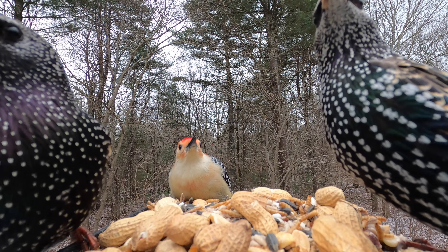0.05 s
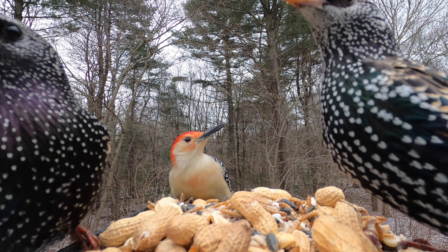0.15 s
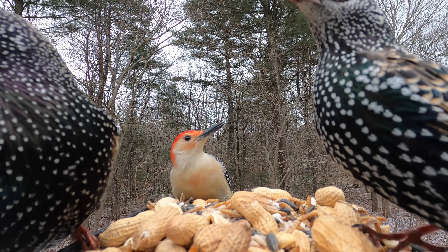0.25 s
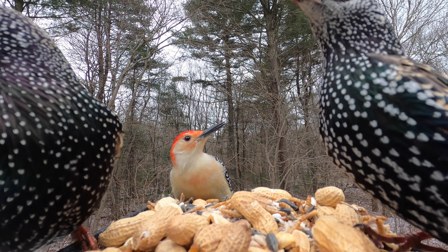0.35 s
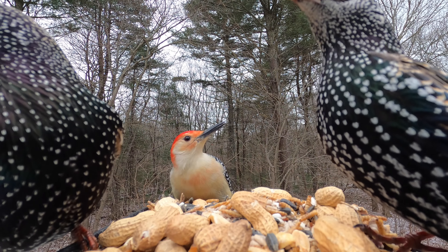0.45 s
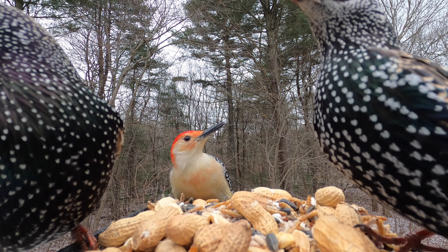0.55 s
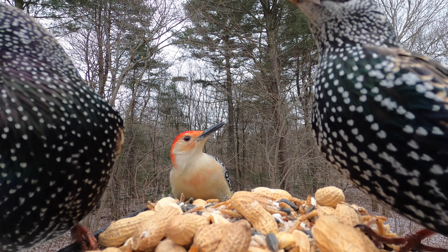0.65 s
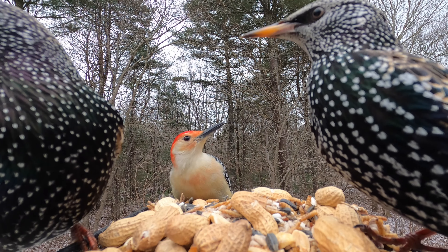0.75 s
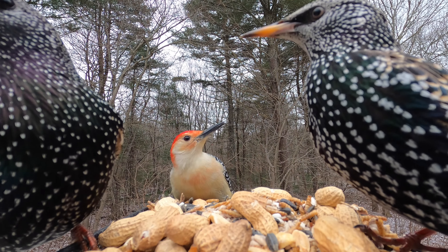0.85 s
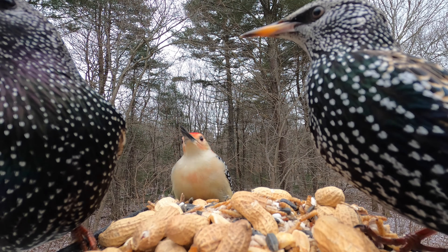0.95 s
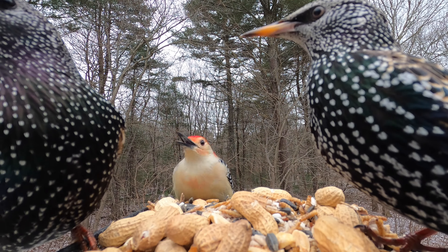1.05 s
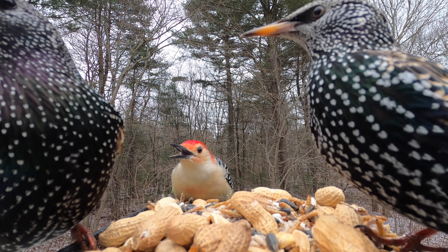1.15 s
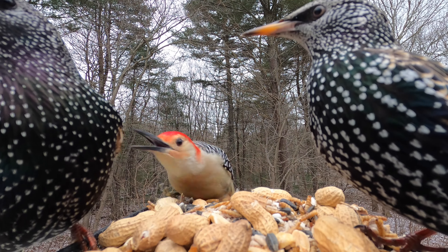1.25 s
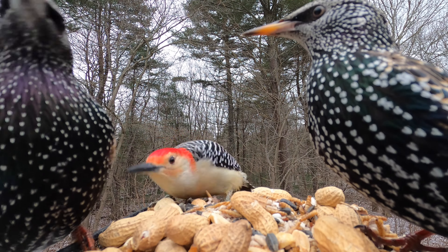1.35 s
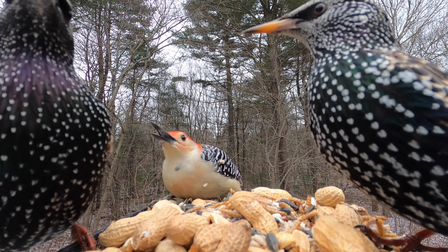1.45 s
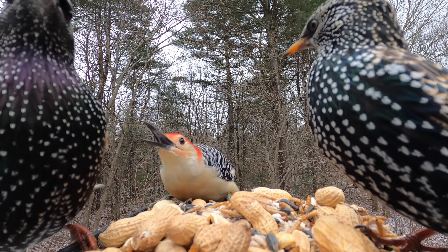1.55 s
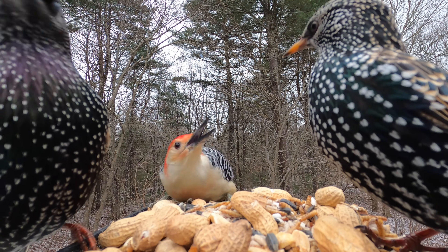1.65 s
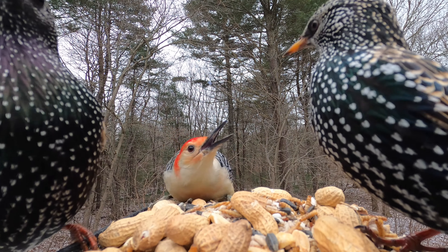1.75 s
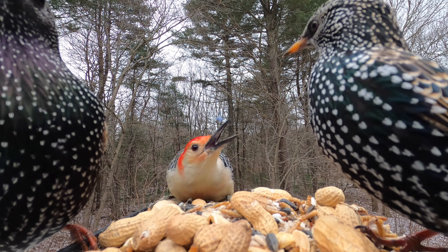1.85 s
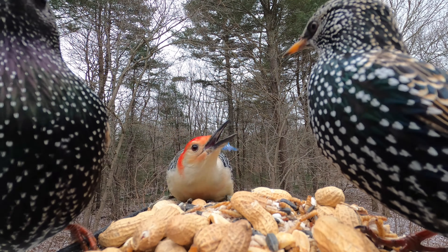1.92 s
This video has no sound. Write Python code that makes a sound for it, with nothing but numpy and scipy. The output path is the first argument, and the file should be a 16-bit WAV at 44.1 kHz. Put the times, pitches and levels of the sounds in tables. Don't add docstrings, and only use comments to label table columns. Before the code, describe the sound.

Near-mono close pickup on a tray of peanuts in bare woodland. Bright, nasal woodpecker calls of about a third of a second slide downward and ring briefly among the trees. Between them, beaks knock the tray, claws tick hollow shells and husks crackle, strongest near five seconds. Low wind rumble and puffs bump the microphone over a faint woodland hush.

```python
import sys
import numpy as np
from scipy import signal
from scipy.fft import rfft, irfft, next_fast_len
from scipy.io import wavfile
from scipy.ndimage import uniform_filter1d

SR = 44100
rng = np.random.default_rng(int(sys.argv[2]) if len(sys.argv) > 2 else 0)


def linear_from_db(decibels):
    return 10 ** (np.asarray(decibels, float) / 20)


def dump(signal):
    limited = np.clip(np.atleast_2d(signal).T, -1, 1)
    pcm = np.round(limited * 32767).astype(np.int16)
    wavfile.write(sys.argv[1], SR, pcm)


N = 264908

# (frequency [Hz], level [dB])
AIR_COLOUR = [(150, -41), (250, -2), (460, -6), (1000, -15), (1700, -20.5), (2300, -25.5), (3600, -21.5),
              (4500, -27), (7700, -30), (9300, -38), (16000, -71.5)]
# (time [s], level [dB])
HUSH_DRIFT = [(0, 0), (.9, -4), (1.799, -2.5), (2.6, -6), (4.199, -3), (6.01, 2.5)]
# (frequency [Hz], time to fall 60 dB [s])
WOODS_RING = [(900, 2.3), (3500, 0.99), (7000, 0.78), (12000, 1.06)]
WOODS_DB = -15

# (start [s], end [s], level [dB], start pitch [Hz], end pitch [Hz])
FAR_CALLS = [
    (0.57, 0.66, -82, 875, 906),
    (0.662, 0.764, -80.5, 922, 795),
    (0.74, 0.85, -88.5, 918, 897),
    (4.723, 5.018, -82, 936, 807),
]
# (start [s], end [s], level [dB], start pitch [Hz], end pitch [Hz])
FAR_CHIPS = [
    (1.026, 1.06, -65.5, 1470, 1235),
    (1.083, 1.106, -68, 1440, 1260),
    (1.15, 1.18, -100, 1310, 1150),
]
# (start [s], end [s], level [dB], start pitch [Hz], end pitch [Hz])
SOFT_CLUCKS = [
    (0.05, 0.078, -53, 1105, 977),
    (0.11, 0.131, -58.5, 1165, 960),
    (0.173, 0.194, -57.5, 1137, 1058),
    (0.248, 0.263, -57.5, 1190, 1006),
    (0.316, 0.347, -67, 960, 926),
    (5.135, 5.203, -79, 8600, 9500),
]

# (time [s], rumble level [dB])
WIND_LEVEL = [(0, -35.5), (.25, -44), (.75, -26.5), (1.1, -35.5), (1.49, -33), (1.59, -48.5), (1.69, -26),
              (1.94, -34), (2.06, -48), (2.32, -30.5), (2.49, -47), (3.05, -35), (3.29, -43), (3.81, -45),
              (4.12, -31), (4.57, -46), (5.29, -35.5), (6.01, -42)]
# (frequency [Hz], level [dB])
RUMBLE_COLOUR = [(12, -40), (25, -1), (60, 0), (100, -10.5), (200, -24.5), (400, -89), (1500, -140)]
# (frequency [Hz], level [dB])
BUFFET_COLOUR = [(50, -21.5), (110, 5), (220, -3.5), (330, -16), (500, -29.5), (900, -54), (3000, -140)]
# (time [s],
# peak level [dB], half length [s])
WIND_PUFFS = [(0.347, -38.5, 0.0094), (0.445, -37.5, 0.0093), (0.52, -53, 0.014), (0.65, -30.5, 0.012),
              (0.733, -36, 0.011), (0.783, -30, 0.0056), (0.827, -36, 0.012), (0.929, -34, 0.018),
              (0.999, -18.5, 0.014), (1.079, -38.5, 0.011), (1.149, -38.5, 0.0089), (1.285, -38, 0.012),
              (1.389, -37.5, 0.0093), (1.49, -39.5, 0.0058), (1.702, -35, 0.011), (1.906, -56, 0.01),
              (2.281, -44, 0.0097), (2.349, -38.5, 0.01), (2.926, -36, 0.0057), (3.029, -42, 0.0043),
              (3.073, -34, 0.0023), (3.118, -19.5, 0.034), (3.875, -44, 0.0076), (3.968, -25.5, 0.0094),
              (4.027, -38.5, 0.024), (4.149, -27.5, 0.011), (4.324, -39, 0.02), (4.63, -45.5, 0.016),
              (4.994, -49, 0.012), (5.226, -30, 0.0038), (5.431, -39.5, 0.017), (5.554, -43.5, 0.012),
              (5.732, -39, 0.0085), (5.835, -41, 0.019), (5.913, -31.5, 0.024), (5.994, -50, 0.0097)]

# (start [s], length [s], dull scrape [dB], bright crackle [dB])
SHELL_MOVES = [(0.301, 0.08, -57, -69.5), (1.321, 0.11, -42.5, -53.5), (1.415, 0.049, -58, -64),
               (1.454, 0.12, -55.5, -63), (2.814, 0.054, -40.5, -40.5), (2.789, 0.032, -44.5, -47.5),
               (2.9, 0.11, -80, -59.5), (3.056, 0.012, -56, -55.5), (3.142, 0.082, -46.5, -53),
               (2.102, 0.018, -51.5, -83), (2.127, 0.071, -51, -61.5), (5.831, 0.024, -49, -51.5),
               (5.869, 0.022, -51, -55), (3.185, 1.25, -73, -71), (3.343, 0.061, -53.5, -53),
               (3.416, 0.096, -60.5, -72), (3.519, 0.091, -68.5, -71), (3.627, 0.023, -64, -67),
               (3.723, 0.076, -66.5, -64.5), (3.841, 0.044, -87, -73), (3.963, 0.041, -60, -58),
               (4.057, 0.03, -99, -66), (4.708, 0.24, -94, -66.5), (4.303, 0.08, -46, -58),
               (4.319, 0.14, -59, -62), (4.609, 0.07, -44, -52), (4.674, 0.031, -58, -59.5),
               (4.925, 0.21, -61.5, -75), (4.982, 0.055, -41, -43), (5.03, 0.044, -58, -60.5),
               (5.07, 0.11, -83, -61.5), (5.217, 0.048, -40.5, -43.5), (5.257, 0.23, -63.5, -66),
               (5.393, 0.12, -43.5, -66)]
# (frequency [Hz], level [dB])
SCRAPE_COLOUR = [(180, -31), (300, -21.5), (788, 5), (1100, 0.5), (2650, -1), (3350, 0.5), (5000, -3.5),
                 (6500, -31.5), (11000, -120)]
# (frequency [Hz], level [dB])
CRACKLE_COLOUR = [(2500, -24), (3500, -8), (4500, 0), (5800, -5), (7800, -3), (9300, -26), (16000, -50)]
# (frequency [Hz], level [dB])
WHOLE_SHELLS = [(5000, -5), (6500, -25)]
# (frequency [Hz], level [dB])
THIN_SPLINTERS = [(5000, -20), (6500, 0)]
# (frequency [Hz], level [dB])
SPLINTER_COLOUR = [(8000, -29), (10000, -4), (12000, -6), (16000, -21.5)]

# (time [s], knock peak [dB], snap against knock [dB], knock pitch [Hz])
HARD_PECKS = [
    (1.3351, -22, -19.5, 1500),
    (3.1554, -34, 3, 1700),
    (3.1725, -22.5, -3.5, 1840),
    (4.314, -25.5, 1, 1300),
    (4.6161, -15, -11, 1506),
    (4.6481, -24, 2, 1390),
    (4.99, -8.5, -11.5, 1930),
    (5.22, -12, -3.5, 1440),
]
# (time [s], knock peak [dB], snap against knock [dB])
TRAY_KNOCKS = [(0.314, -35, -2), (1.226, -53.5, -3), (1.2473, -34, -6.5), (1.3163, -44, 2),
               (1.3284, -36, -15), (1.3435, -24, -24), (1.356, -35, -6), (1.537, -44, -10.5),
               (3.487, -41.5, -10), (3.149, -30, 0), (5.144, -49, -3), (1.3747, -39, -14.5),
               (1.3963, -44.5, 13.5), (1.498, -36, -1), (1.666, -49, -7.5), (2.829, -41, 22),
               (2.84, -40, 9), (2.8309, -26.5, 1), (2.823, -26, -10), (2.8197, -33, -6), (2.834, -38, -12),
               (3.1841, -35, 3), (3.3614, -35, 5), (4.321, -32, 1), (4.323, -29.5, -20), (4.311, -37, -8.5),
               (4.3352, -22.5, 6), (4.3636, -30.5, -36), (4.396, -49, 1), (4.437, -55, -2),
               (4.946, -55.5, -17), (5.0222, -47, 19), (5.2345, -21.5, 1), (5.2516, -49, 16),
               (5.2669, -43, 10)]
# (time [s],
# tick peak [dB], pitch [Hz])
SHELL_TICKS = [(1.246, -33, 4150), (1.228, -54, 3870), (1.313, -38.5, 3900), (1.339, -33, 3300),
               (1.357, -31, 3400), (1.375, -38, 3230), (1.2918, -39.5, 3850), (1.3443, -32, 3460),
               (1.4374, -42, 3210), (2.4513, -50, 3000), (3.06, -42, 4610), (3.2773, -34, 3470),
               (3.4085, -37.5, 3680), (3.4602, -28, 5200), (3.468, -26, 4660), (3.471, -25, 3370),
               (3.539, -41, 4460), (3.557, -38, 4360), (3.5669, -33, 3500), (3.6324, -42.5, 4330),
               (3.644, -41, 3760), (3.7283, -44, 4550), (3.736, -40.5, 4400), (3.762, -29.5, 4050),
               (3.852, -35.5, 4680), (3.867, -33, 4000), (3.8721, -29, 3660), (3.9586, -32, 3840),
               (3.9814, -35.5, 3500), (3.988, -43, 4110), (4.07, -42.5, 4990), (5.097, -32.5, 5130),
               (5.1163, -31.5, 3560), (5.2385, -27, 5140), (5.488, -40, 4600), (5.585, -29, 4700),
               (5.592, -35, 4530), (4.374, -42, 5560), (5.2737, -27.5, 3940), (5.353, -47, 4790),
               (5.3775, -22, 5000), (5.2202, -14, 3510), (2.447, -47.5, 4150), (4.683, -43, 3450),
               (1.95, -38.5, 4750)]
# (time [s], snap peak [dB])
EDGE_SNAPS = [(0.289, -47.5), (1.474, -37), (1.573, -51), (2.852, -39), (2.939, -46), (2.958, -45),
              (3.0493, -36.5), (3.225, -45.5), (3.349, -43.5), (3.354, -70), (3.5703, -31.5), (3.763, -28),
              (4.015, -47), (4.108, -57), (4.177, -55.5), (4.455, -46.5), (4.43, -51.5), (4.486, -56),
              (4.502, -57), (4.559, -48.5), (5.283, -45.5), (4.569, -41), (4.6255, -25), (4.6265, -30),
              (4.6417, -32), (4.643, -39), (4.646, -28), (4.6503, -16), (4.787, -50), (5.0181, -26),
              (4.9962, -31), (4.9935, -37), (5.2395, -28), (5.271, -44), (5.03, -38), (5.143, -45),
              (5.185, -41), (5.202, -43), (5.2435, -33), (5.3104, -36), (5.325, -50)]
KNOCK_HZ, KNOCK_WIDTH_HZ = 1500, 1600
SHELL_HZ = 3460

# (time [s], effort [dB], pitch [Hz])
NEAR_CALLS = [
    [(0, -30.5, 855), (.086, -34, 831), (.1, -37, 734)],
    [(1.948, -34.5, 957), (1.96, -38, 924), (1.974, -29, 942), (2.016, -26, 925.6), (2.09, -28, 897),
     (2.18, -28, 860.6), (2.286, -30.5, 810.4), (2.302, -39, 692)],
    [(2.463, -40, 983), (2.48, -30, 943), (2.497, -27, 973), (2.545, -24.5, 960), (2.625, -26.5, 892),
     (2.685, -30.5, 876), (2.76, -32.5, 776), (2.815, -37.5, 824)],
    [(5.3745, -35.5, 918), (5.39, -32.5, 950), (5.413, -24, 954.5), (5.523, -26, 884), (5.6, -28, 858),
     (5.63, -27, 850.6), (5.722, -30.5, 794), (5.736, -43, 741)],
    [(5.795, -37.5, 933), (5.812, -21.5, 965), (5.826, -29, 962.4), (5.889, -29.5, 938.3),
     (6.01, -30.5, 901)],
]
# (multiple of the pitch [count], level [dB])
VOICE_PARTIALS = [(1, -32.5), (2, -31.5), (3, -13.5), (4, -2), (5, -22), (6, -17), (7, -19), (8, -22),
                  (9, -26), (10, -30.5), (11, -42.5), (12, -49.5), (13, -45), (14, -47.5), (15, -55),
                  (16, -63), (17, -61)]
USUAL_HZ = 860
# (frequency [Hz], level [dB])
BREATH_COLOUR = [(700, -23), (1000, -6), (2400, -15.5), (3500, 4.5), (4400, 10), (5800, -6.5), (7000, -4),
                 (9500, -13), (12300, -33.5), (16000, -84)]
# (odd partials [dB], brightness [dB per partial], second partial [dB])
CALL_TIMBRE = [(-6, 1.77, 19.5), (-2.5, 1.48, 20.5), (-5, 0.5, 18.5), (-3, 1.47, 20.5), (-6, -1, 21)]
# (pitch [Hz], level [dB], strong-weak cycles at the start [0-1])
OTHER_HALF = [(990, -27.5, 0.02), (965, -26, 0.02), (1049, -20, 0.08), (960, -24.5, .05), (1030, -24, 0.04)]
MIXED_LINES = [(2, 2), (4, 1), (6, -1), (2, 1), (4, 2), (6, 1)]
MIXED_LINES_DB = [-10, -15, -19, -17, -19.5, -25]
# (mixed lines [dB], breath [dB], flutter [0-1], smear [turns])
CALL_GRIT = [(3, 5.5, 0, .0005), (0, 4.5, 0, 0.00044), (5, 1.5, 0.27, 0.0033), (-2.5, 4, 0, 0.0019),
             (-6, 16, 0.13, 0.011)]
CRACK_TIMES = [-.03, 2.18, 2.69, 5.602, 6.05]
# (spring time against the usual [ratio], falter of the fourth partial [dB])
CALL_SCOOPS = [(1, 0), (1, 0), (.9, -5), (1, 0), (1.45, -22)]
SECOND_GROWTH = [0.1, 34, 8.8, 37, 1.5]

# (frequency [Hz], level [dB])
BAND_LIMIT = [(15850, 0), (16500, -40)]
# (frequency [Hz], level [dB])
SIDE_LEVEL = [(50, -68), (800, -27), (1500, -33), (3500, -47.5), (6000, -33), (9000, -28), (13000, -2)]


def evened(x):
    return x / np.sqrt(np.mean(x ** 2) + 1e-20)


def read(points, hz):
    f, value = np.transpose(points)
    return np.interp(np.log(hz + 1), np.log(f + 1), value)


def coloured(x, points):
    size = next_fast_len(len(x))
    gain = linear_from_db(read(points, np.fft.rfftfreq(size, 1 / SR)))
    return irfft(rfft(x, size) * gain, size)[:len(x)]


def shaped(loudness, x, points):
    return loudness * evened(coloured(x, points))


def wander(size, hz):
    return evened(coloured(rng.standard_normal(size), [(hz, 0), (2 * hz, -30), (4 * hz, -200)]))


def add(mix, s, sound):
    part = mix[round(s * SR):][:len(sound)]
    part += sound[:len(part)]


def air():
    drift_db = np.interp(np.arange(N) / SR, *np.transpose(HUSH_DRIFT))
    return shaped(linear_from_db(-64 + drift_db + 1.3 * wander(N, 1.0)), rng.standard_normal(N), AIR_COLOUR)


def woods(x):
    hz, t, z = signal.stft(rng.standard_normal(2 * SR), SR, nperseg=256)
    decay = linear_from_db(-60 * t / read(WOODS_RING, hz)[:, None])
    tail = signal.istft(z * decay, SR, nperseg=256)[1]
    t = np.arange(len(tail)) / SR
    tail = tail * np.clip(t / 0.013, 0, 1)
    near = rng.standard_normal(len(t)) * linear_from_db(-60 * t / 0.13) * (t > .003)
    both = linear_from_db(WOODS_DB) * tail / np.linalg.norm(tail) + linear_from_db(-9.5) * near / np.linalg.norm(near)
    return signal.fftconvolve(x, both)[:len(x)]


def far_note(row, partials, bend):
    t0, t1, db, hz0, hz1 = row
    u = np.linspace(0, 1, round((t1 - t0) * SR))
    turns = np.cumsum(hz1 + (hz0 - hz1) * (1 - u) ** bend) / SR
    tone = np.zeros(len(u))
    for k, partial_db in partials:
        tone += linear_from_db(partial_db) * (1 + 0.56 * wander(len(u), 40)) * np.cos(2 * np.pi * k * turns)
    return t0, linear_from_db(db) * np.sqrt(2) * tone * signal.windows.tukey(len(u), .3)


def wind():
    eddies = wander(N, 14.7)
    rumble = evened(coloured(rng.standard_normal(N) * linear_from_db(3.5 * eddies), RUMBLE_COLOUR))
    buffet = evened(coloured(rng.standard_normal(N) * linear_from_db(4.5 * eddies), BUFFET_COLOUR))
    t = np.arange(N) / SR
    wind_db = np.interp(t, *np.transpose(WIND_LEVEL))
    puffs = sum(linear_from_db(db - 7 * abs(t - s) / half_s) for s, db, half_s in WIND_PUFFS)
    jet = coloured(rng.standard_normal(N), BUFFET_COLOUR)
    jet = jet / np.sqrt(uniform_filter1d(jet ** 2, size=1100) + 1e-12)
    steady = linear_from_db(wind_db - 4.0) * rumble + linear_from_db(-58.5 + 0.76 * (wind_db + 35)) * buffet
    return steady + puffs * (0.47 * rumble + 0.67 * jet)


def grains(per_s, spread_db):
    size = linear_from_db(spread_db * np.minimum(rng.exponential(1, N), 3)) * (rng.random(N) < per_s / SR)
    return evened(size * rng.standard_normal(N)) + 0.11 * rng.standard_normal(N)


def shuffle():
    dull, bright = np.zeros((2, N))
    for s, length, dull_db, bright_db in SHELL_MOVES:
        u = np.linspace(0, 1, round(length * SR))
        shape = np.minimum(12 * u, 1) * np.cos(np.pi * u / 2) * linear_from_db(-5 * u)
        add(dull, s, linear_from_db(dull_db) * shape)
        add(bright, s, linear_from_db(bright_db) * shape)
    cracks = grains(3500, 3.7)
    hard = bright * linear_from_db(-11) * np.minimum(bright / linear_from_db(-60), 1)
    crackle = coloured(grains(900, 3.0), WHOLE_SHELLS) + coloured(cracks, THIN_SPLINTERS)
    sound = shaped(dull, grains(1700, 4.6), SCRAPE_COLOUR)
    sound += shaped(bright, crackle, CRACKLE_COLOUR)
    return sound + shaped(hard, cracks, SPLINTER_COLOUR)


def ring(hz, width_hz, chance):
    t = np.arange(500) / SR
    u = np.pi * width_hz * (t - .001) * np.exp(.1 * chance[1])
    loudness = np.exp(np.where(u < 0, -.3 * u ** 2, 1 - np.sqrt(1 + .5 * u ** 2)))
    return loudness * np.sin(2 * np.pi * hz * t + 6 * chance[2])


def tap_rows():
    knocks = [(*row, KNOCK_HZ) for row in TRAY_KNOCKS]
    for s, db, snap, hz in HARD_PECKS:
        knocks.append((s, db, snap, hz))
        knocks.append((s - .0042, db - 15, snap - 6, hz))
        knocks.append((s + .0046, db - 14, snap - 6, hz))
    rows = [(s, db, hz, db - 4 + 0.75 * snap, SHELL_HZ, db + snap) for s, db, snap, hz in knocks]
    rows += [(s, db - 27, KNOCK_HZ, db, hz, db - 12.5) for s, db, hz in SHELL_TICKS]
    return rows + [(s, db - 16, KNOCK_HZ, db - 14.5, SHELL_HZ, db) for s, db in EDGE_SNAPS]


def taps():
    out, rows = np.zeros(N), tap_rows()
    chances = rng.standard_normal((len(rows), 104, 3))
    rattle_decay = linear_from_db(-60 * np.arange(300) / SR / .012)
    for (s, knock_db, knock_hz, tick_db, tick_hz, snap_db), chance in zip(rows, chances):
        a, b, c, d = chance[:4]
        rattle = .14 * chance[4:].ravel() * rattle_decay
        rattle[0] = 1
        spread = np.exp(.04 * chance[:, 0])
        tap = linear_from_db(knock_db) * ring(knock_hz * spread[0], KNOCK_WIDTH_HZ, a)
        tap += linear_from_db(tick_db) * ring(tick_hz * spread[1], 1900, b)
        tap += linear_from_db(snap_db) * ring(7100 * spread[2], 3300, c)
        tap += linear_from_db(snap_db - 18 + 2.5 * d[0]) * ring(12200, 2500, d)
        tap += linear_from_db(knock_db - 16) * ring(300, 230, d) * signal.windows.tukey(len(tap), .2)
        tap[44] += linear_from_db(snap_db - 8)
        add(out, s - .001, np.convolve(tap, rattle / np.linalg.norm(rattle)))
    return out


def smeared(x):
    t = np.arange(900) / SR
    ahead = rng.standard_normal(len(t)) * linear_from_db(-60 * t / .05)
    hiss = signal.fftconvolve(x, ahead[::-1] / np.linalg.norm(ahead))[len(t) - 1:]
    return x + linear_from_db(-17) * hiss


def call_pitch(t, hz, spring):
    hz = uniform_filter1d(hz, size=400, mode="nearest")
    started_here = t[0] > 0
    return hz * (1 - .345 * started_here * np.exp(-np.maximum(t - t[0] - .004, 0) / .0058 / spring))


def breath(turns):
    size = len(turns)
    bursts = linear_from_db(wander(size, 120)) * (0.18 + np.exp(-(turns % 1) / 0.77))
    return evened(coloured(bursts * rng.standard_normal(size), BREATH_COLOUR))


def call(rows, crack_s, timbre, other_half, grit, scoop, second_per_s):
    odd_db, bright_db, second_db = timbre
    other_hz, other_db, uneven = other_half
    mixes_db, breath_db, flutters, smear = grit
    spring, falter_depth_db = scoop
    s, *columns = np.transpose(rows)
    t = np.arange(s[0], s[-1], 1 / SR)
    size = len(t)
    effort_db, hz = (np.interp(t, s, c) for c in columns)
    hz = call_pitch(t, hz, spring)
    falter_db = falter_depth_db * np.exp(-((t - s[0] - .013) / .007) ** 2)

    clear = .05
    cracked = np.maximum(t - crack_s, 0)
    hoarse = np.clip(clear + .55 * np.minimum(cracked / .018, 1) + 2.6 * cracked, 0, 1)
    half = .8 * cracked + uneven * np.clip(1.6 - (t - t[0]) / .06, 0, 1)
    second_db = second_db + second_per_s * (t - s[-1]) + 55 * np.clip(1 - hz / USUAL_HZ - .07, 0, 1)
    shut = np.clip(1 - hz / np.max(hz) - .04, 0, 1) * (t < t[0] + .05)

    turns = np.cumsum(hz * (1 + (.0006 + .0025 * hoarse) * wander(size, 150))) / SR
    turns = turns + (smear + .0065 * hoarse ** 2) * wander(size, 400)
    other = np.cumsum(other_hz * (1 + .004 * wander(size, 40))) / SR
    beat = 2 * np.pi * (other - turns)
    voice = linear_from_db(other_db) * hoarse * (.55 * np.cos(2 * np.pi * other) + np.cos(4 * np.pi * other))
    for (a, b), db in zip(MIXED_LINES, MIXED_LINES_DB):
        strength = linear_from_db(db + mixes_db) * (hoarse - clear) * (1 + .5 * wander(size, 86))
        voice += strength * np.cos(2 * np.pi * (a * turns + b * other))

    grain = .55 * hoarse ** 2 * wander(size, 350)
    throat = [(k * USUAL_HZ, db) for k, db in VOICE_PARTIALS]
    for k, db in VOICE_PARTIALS:
        odd = k % 2
        level_db = 0.9 * read(throat, k * np.minimum(hz, USUAL_HZ)) + 0.27 * db + odd_db * odd
        level_db = level_db + (bright_db - .5 * hoarse ** 2) * max(k - 4, 0)
        level_db = level_db + second_db * (k == 2) + falter_db * (k == 4)
        level_db = level_db + 6 * np.exp(-((k * hz - 7020) / 250) ** 2)
        level_db = level_db + shut * (-80 * odd + 30 * (k in (6, 8)) - 30 * (k > 8) - 15 * (k == 4))
        flutter = 1 + (flutters + .22 * odd + 0.06 * hoarse + .7 * half) * wander(size, 60)
        flutter = flutter + grain * (k > 4) + .3 * grain * (k > 2)
        depth = hoarse * min(k / 4, 1.5) * (k > 2) * linear_from_db(.5 * (other_db + 11))
        shake = .85 * depth * np.sin(beat) + 2 * np.pi * rng.random()
        wave = np.cos(2 * np.pi * k * turns + shake)
        voice += linear_from_db(level_db) * flutter * (1 + .6 * depth * np.cos(beat)) * wave
    for k in range(18, 23):
        voice += linear_from_db(-59 + 4.3 * bright_db) * (1 - hoarse) * np.cos(2 * np.pi * (32000 * t - k * turns))

    voice *= 1 + half * (.5 * np.cos(np.pi * turns) + np.cos(3 * np.pi * turns))
    sound = np.sqrt(2) * (1 - .2 * hoarse) * voice
    sound += linear_from_db(breath_db) * (.25 * hoarse ** 1.5) * breath(turns)
    return s[0], linear_from_db(effort_db) * sound * signal.windows.tukey(size, .02)


def scene():
    lead = .3
    birds, distant = np.zeros((2, N + round(lead * SR)))
    _, earlier = call(NEAR_CALLS[1], CRACK_TIMES[1], CALL_TIMBRE[0], OTHER_HALF[0], CALL_GRIT[1],
                      CALL_SCOOPS[1], SECOND_GROWTH[0])
    add(birds, 0, earlier[:round(lead * SR)] * linear_from_db(-3.5))
    settings = zip(NEAR_CALLS, CRACK_TIMES, CALL_TIMBRE, OTHER_HALF, CALL_GRIT, CALL_SCOOPS, SECOND_GROWTH)
    near = [call(*one) for one in settings]
    near += [far_note(row, [(0.95, 0.018)], 0.99) for row in SOFT_CLUCKS]
    far = [far_note(row, [(2, -22.0), (3, -1), (4, 9)], .75) for row in FAR_CALLS]
    far += [far_note(row, [(2, -10), (3, -10.0), (4, -18)], 1.4) for row in FAR_CHIPS]
    for s, sound in near:
        add(birds, s + lead, sound)
    for s, sound in far:
        add(distant, s + lead, sound)
    calls = birds + distant + woods(birds + linear_from_db(7) * distant)
    tray = smeared(taps()) + shuffle()
    tray_echo = linear_from_db(-32.5 - WOODS_DB) * woods(tray)
    mono = calls[-N:] + tray + tray_echo + wind() + air()
    return np.array([mono, mono])


def band_limit(x):
    return signal.sosfilt(signal.butter(12, 16410, fs=SR, output="sos"), x)


def record(dry):
    middle = coloured(dry[0], BAND_LIMIT)
    side = coloured(middle, SIDE_LEVEL) * (wander(N, 210) - .4)
    return band_limit(np.array([middle + side, middle - side]))


dry = scene()
out = record(dry)
dump(out)
```